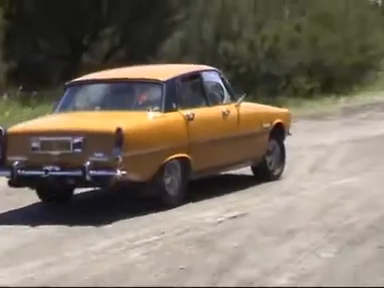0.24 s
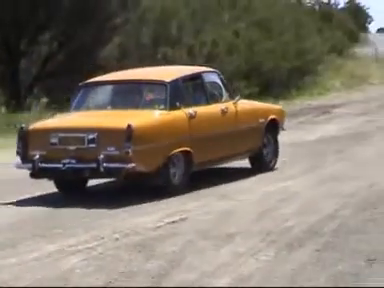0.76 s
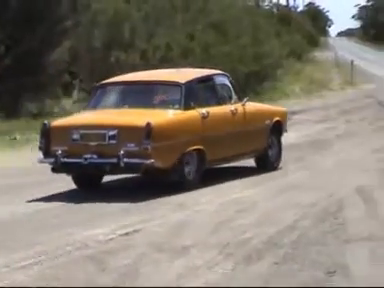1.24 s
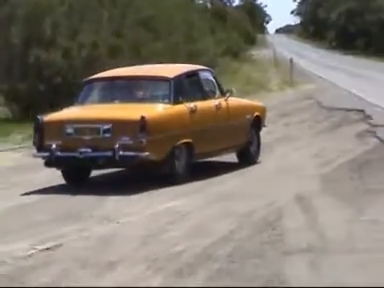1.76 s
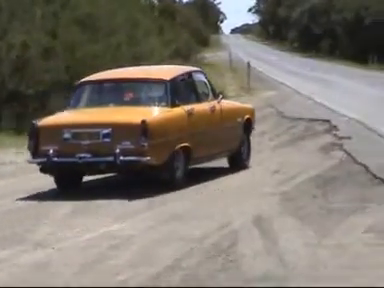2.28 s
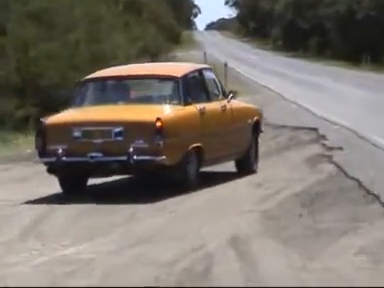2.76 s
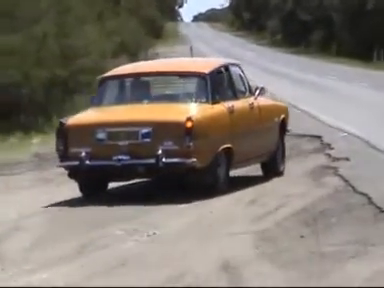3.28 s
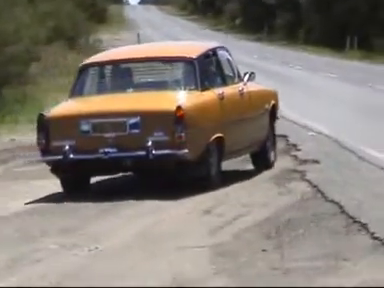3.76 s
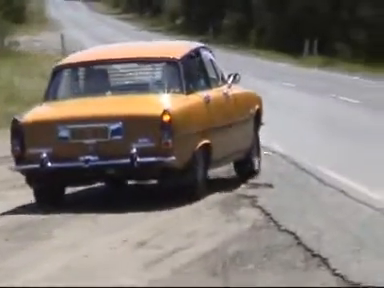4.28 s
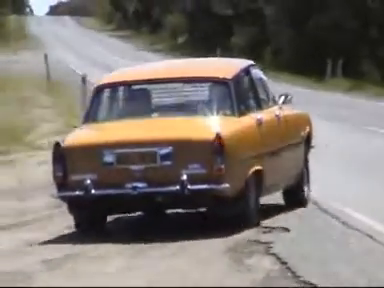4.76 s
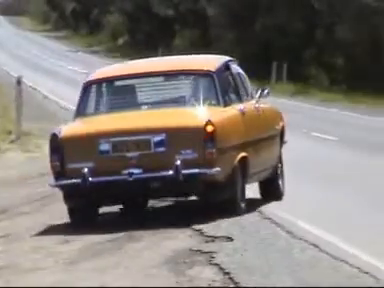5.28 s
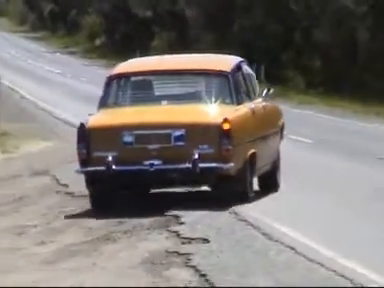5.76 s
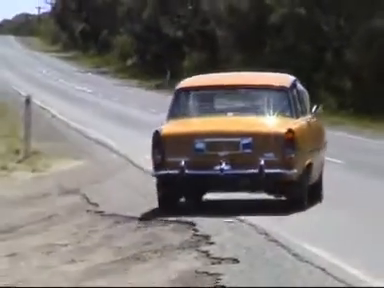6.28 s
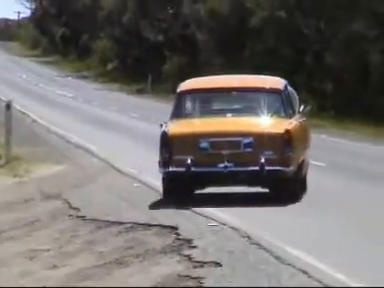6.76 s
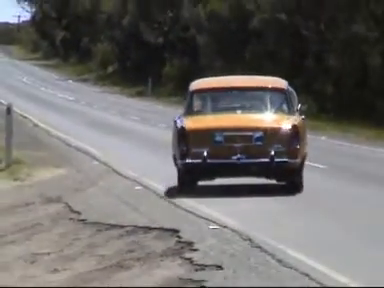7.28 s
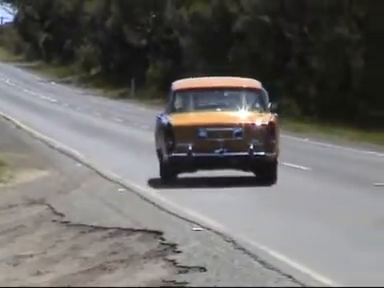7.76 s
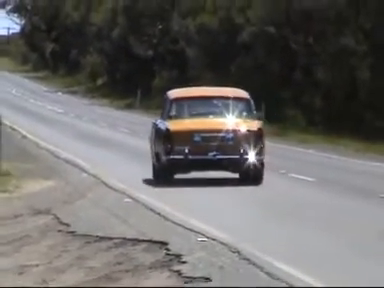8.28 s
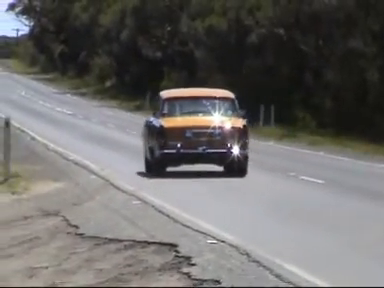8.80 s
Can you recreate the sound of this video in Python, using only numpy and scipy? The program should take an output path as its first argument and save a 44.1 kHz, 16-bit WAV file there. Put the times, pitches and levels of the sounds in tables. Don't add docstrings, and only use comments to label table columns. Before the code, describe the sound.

Open roadside, close stereo microphones behind an old eight-cylinder saloon, dry with almost no echo. From 0 to 1.5 s it creeps with a low, lumpy exhaust burble, tyres crunching loose gravel, small stones snapping brightly. Around 1.7 s the engine drops to a softer, slower idle until 3.1 s; stones keep ticking, with firm dull knocks near 2.2 and 2.5 s. Revs jump from 3.2 to 3.9 s as it pulls away, with a deep knock and low squeak near 3.8 s. A quick falling spring squeak comes at 4.45 s, a tiny chirp at 4.9 s, then a sandy scuff around 5.2 s. A strong crunch at 6.1 s and faint knocks follow as gravel fades. The engine eases from 6 to 7.1 s, then from 7.5 s pulls harder, fuller and raspier, pitch climbing, still strong at 9 s. Faint hiss and thin high motor whine run throughout.

```python
import sys
import numpy as np
from scipy import signal
from scipy.fft import rfft, irfft, next_fast_len
from scipy.io import wavfile
from scipy.ndimage import uniform_filter1d

SR = 44100
rng = np.random.default_rng(int(sys.argv[2]) if len(sys.argv) > 2 else 0)


def linear_from_db(decibels):
    return 10 ** (np.asarray(decibels, float) / 20)


def digitize_waveform(pressure):
    field = np.atleast_2d(pressure).T
    bounded = np.clip(field, -1, 1)
    quanta = np.round(bounded * 32767).astype(np.int16)
    wavfile.write(sys.argv[1], SR, quanta)


N = 398223
T = np.arange(N) / SR


def evened(x):
    return x / np.sqrt(np.mean(x ** 2) + 1e-20)


def curve(rows):
    seconds, *columns = np.transpose(rows)
    return [np.interp(T, seconds, column) for column in columns]


def read(points, hz):
    table_hz, value = np.transpose(points)
    return np.interp(np.log(hz + 1), np.log(table_hz + 1), value)


def coloured(x, points):
    size = next_fast_len(N + 4096)
    gain = linear_from_db(read(points, np.fft.rfftfreq(size, 1 / SR)))
    return irfft(rfft(x, size) * gain, size)[..., :N]


def ring(x, hz, width):
    decay, turn = np.exp(-np.pi * width / SR), 2 * np.pi * hz / SR
    feedback = [1, -2 * decay * np.cos(turn), decay * decay]
    return signal.lfilter([0, 2 * (1 - decay) * np.sin(turn)], feedback, x)


# frequency in Hz, likeness from 0 to 1.
LIKENESS = [(60, .99), (280, .995), (620, .99), (1350, .97), (2930, .945), (6000, .92), (9000, .72),
            (13000, .9)]


def paired(shared, loose):
    size = next_fast_len(N)
    same = np.clip(read(LIKENESS, np.fft.rfftfreq(size, 1 / SR)), 0, 1)
    mid = np.sqrt((1 + same) / 2) * rfft(shared, size)
    side = np.sqrt((1 - same) / 2) * rfft(loose, size)
    return irfft(np.array([mid + side, mid - side]), size)[:, :N]


# frequency in Hz, level in dB per Hz.
HISS_COLOUR = [(1200, -3), (1700, -7.5), (2050, -13.5), (2400, -6), (2900, -6), (4000, -11.5), (5600, -11),
               (7000, -10), (9000, -26.5), (12000, -24), (15500, -33)]
# frequency in Hz, level in dB.
MOTOR_TONES = [(5593, -68.5), (5728, -64.5), (6293, -87.5)]


def air():
    hiss = linear_from_db(-55) * evened(coloured(rng.standard_normal((2, N)), HISS_COLOUR))
    waver = 1 + 0.00089 * evened(uniform_filter1d(rng.standard_normal(N), 4000))
    warped_time = np.cumsum(waver) / SR
    whine = sum(linear_from_db(db + 1) * np.sin(2 * np.pi * hz * warped_time) for hz, db in MOTOR_TONES)
    return hiss + whine


# start in seconds, length in seconds, first Hz, last Hz, level in
# dB.
SHORT_SQUEAKS = [
    (3.725, .05, 600, 1000, -32),
    (4.41, .03, 3900, 3700, -43),
    (4.435, .055, 2300, 1650, -36),
    (4.43, .055, 6100, 5800, -42),
    (4.43, .04, 3500, 3200, -44),
    (4.92, .04, 5000, 5050, -45),
    (7.46, .06, 2420, 2400, -50),
]


def squeaks():
    out = np.zeros(N)
    for start, length, from_hz, to_hz, db in SHORT_SQUEAKS:
        hz = np.linspace(from_hz, to_hz, round(length * SR))
        rough = 1 + .5 * evened(uniform_filter1d(rng.standard_normal(len(hz)), 60))
        whistle = np.sin(2 * np.pi * np.cumsum(hz) / SR)
        out[round(start * SR):][:len(hz)] += linear_from_db(db) * rough * np.hanning(len(hz)) * whistle
    return out


# start in seconds, peak in dB, ring in Hz, treble in dB.
FLICKED_STONES = [(0.1014, -30, 2880, -10.5), (0.7902, -43, 4870, -3), (0.9605, -27, 5700, -9),
                  (1.1336, -22, 5180, -9.5), (1.495, -22.5, 3760, -6), (1.545, -21.5, 3500, -14.5),
                  (2.1327, -27.5, 4780, -7.5), (2.4362, -24.5, 4300, -12.5), (2.461, -25, 3750, -14),
                  (2.8177, -21.5, 4200, -20.5), (3.234, -36, 2470, -17.5), (3.4685, -25.5, 4260, -13),
                  (3.5294, -25.5, 3690, -18.5), (4.0028, -25.5, 2510, -15), (4.2334, -27.5, 3000, -13),
                  (5.343, -25.5, 3800, -4.5), (5.4194, -40, 4280, -6.5), (6.056, -38, 3920, -17),
                  (6.3506, -33, 4750, -2), (6.3586, -30.5, 3900, -21), (6.4038, -31.5, 4400, -15),
                  (6.494, -32, 4050, -9), (6.961, -34, 2540, -21)]
# start in seconds, peak in dB, ring in Hz, treble in dB.
HEAVY_STONES = [
    (2.221, -17, 988, -22),
    (2.447, -20, 1030, -28),
    (2.505, -14, 1270, -30),
    (3.414, -22, 1500, -33),
    (3.816, -17, 902, -29),
    (6.201, -27, 926, -23),
    (6.282, -30.5, 915, -24),
    (6.357, -30, 1700, -16),
]


def stones():
    out, t = np.zeros((2, N + 2000)), np.arange(1500) / SR
    for start, db, hz, treble_db in FLICKED_STONES + HEAVY_STONES:
        noise = rng.standard_normal((2, len(t)))
        knock = evened(ring(ring(noise[0], hz, .6 * hz), hz, 1.1 * hz)) * linear_from_db(-60 * t / .022)
        tick = evened(ring(ring(noise[1], 7500, 4000), 7500, 5000)) * linear_from_db(treble_db - 60 * t / .012)
        lean_db = np.array([[1], [-1]]) * rng.uniform(-2, 2.3)
        out[:, round(start * SR):][:, :len(t)] += linear_from_db(db - 8.0 + lean_db) * (knock + tick)
    return out[:, :N]


# middle in seconds, length in seconds, crunch lift in dB, grit lift in dB.
HEAPS = [
    (0.733, 0.16, -0.5, 6.5),
    (2.486, 0.039, 4.5, 2),
    (2.75, 0.27, 2.5, -2.5),
    (4.455, .05, 0, 4),
    (4.575, .13, 3, 6.5),
    (4.94, 0.067, 3.5, -3),
    (5.187, 0.36, -3, 12),
    (5.37, 0.12, 3, -0.5),
    (6.095, 0.11, 7, -4),
    (9.03, 0.028, 2, 6),
]


def scuffs():
    middle, length, *lifts = np.transpose(HEAPS)
    coarse = T[::64]
    bells = np.exp(-(2 * (coarse[:, None] - middle) / length) ** 2)
    return [np.interp(T, coarse, bells @ lift) for lift in lifts]


# time in seconds, crunch in dB.
GRAVEL = [(0, -34), (.15, -37.5), (.85, -39), (1, -35.5), (1.26, -39.5), (1.76, -37), (2.4, -40),
          (3.24, -42.5), (4.05, -39.5), (4.4, -40.5), (4.7, -42.5), (5.1, -46.5), (5.9, -46.5), (6.2, -51),
          (6.7, -50), (7.6, -46), (8.4, -47.5), (9.03, -47)]
# frequency in Hz, level in dB per Hz.
CRUNCH_COLOUR = [(600, -2), (900, -16), (1350, -2.5), (2000, -8), (2400, -7), (2750, -11), (4000, -9),
                 (5500, -12.5), (6800, -25.5), (9000, -54.5), (12000, -62)]
# frequency in Hz, level in dB per Hz.
GRIT_COLOUR = [(5000, 0), (7000, -2), (9000, -4.5), (11000, -12.5), (13500, -23), (15500, -30.5)]


def tyres():
    crunch_lift_db, grit_lift_db = scuffs()
    crunch_db = curve(GRAVEL)[0] + crunch_lift_db
    grit_db = grit_lift_db - 17 + 6.0
    clumps = linear_from_db(3.5 * evened(uniform_filter1d(rng.standard_normal(N), 900)))
    grains = np.zeros((2, N))
    for hz in np.geomspace(1000, 11000, num=4):
        hit = rng.random(N) < 120 * clumps / SR
        size_db = 2.95 * np.minimum(rng.exponential(1, N), 4)
        clicks = hit * linear_from_db(size_db) * rng.choice([-1, 1], (2, N))
        burst = np.exp(-np.arange(200) / 24.0) * rng.standard_normal(200)
        cracks = signal.oaconvolve(clicks, burst[None], axes=1)[:, :N]
        grains += evened(ring(cracks, hz, 0.83 * hz)) * np.sqrt(hz / 1e4)
    scrape = rng.standard_normal((2, N)) * clumps ** .2
    bed = scrape + 0.38 * evened(grains)
    crunch, grit = evened(coloured(bed, CRUNCH_COLOUR)), evened(coloured(bed, GRIT_COLOUR))
    return paired(*(linear_from_db(crunch_db) * (crunch + linear_from_db(grit_db) * grit)))


# time in seconds, firings a second.
ENGINE_SPEED = [(0.0, 62.85), (0.86, 65.08), (1.44, 64.87), (1.79, 56.03), (3.14, 54.55), (3.6, 64.04),
                (3.76, 78.99), (3.88, 84.53), (4.54, 85.19), (4.81, 82.03), (5.08, 82.83), (5.26, 87.75),
                (5.81, 92.78), (5.96, 97.44), (6.68, 108.36), (7.02, 106.61), (7.59, 121.83),
                (9.03, 132.75)]


def firings():
    return .512 + np.cumsum(curve(ENGINE_SPEED)[0]) / SR


# time in seconds, state (0 creep, 1 idle, 2 pull, 3 ease, 4 drive away).
ENGINE_LOAD = [
    (1.55, 0),
    (1.85, 1),
    (3.1, 1),
    (3.7, 2),
    (5.85, 2),
    (6.25, 3),
    (7.1, 3),
    (7.5, 4),
]


def load_at(seconds):
    return np.interp(seconds, *np.transpose(ENGINE_LOAD))


def by_load(values, state):
    return np.interp(state, np.arange(5), values)


# time in seconds, level of the note in dB.
EFFORT = [(0.0, -14.5), (1.46, -17.5), (1.71, -24), (2.08, -22), (3.14, -25.5), (3.17, -20.5),
          (3.54, -19.5), (3.8, -12.5), (4.83, -15), (5.41, -15), (5.93, -19), (6.19, -17.5), (7.09, -21),
          (7.62, -13), (8.4, -12.5), (9.03, -15)]


def effort_db():
    return curve(EFFORT)[0]


TAIL_RING_DB = [-8.5, -7.5, -6.5, -3, 3.5]
RASP_REPEAT = [.5, .5, .6, .4, .8]
PUFF_LEVEL_DB = [-31.5, -34.5, -35, -31.5, -26]
# frequency in Hz, width in Hz, level in dB.
TAIL_PIPE = [(648, 136, 2.5), (1076, 63, -2.5), (1690, 140, -15.5), (2397, 160, -21.5), (535, 86, -11.5)]
# frequency in Hz, level in dB per Hz.
RUMBLE_COLOUR = [(30, -47), (45, -16.5), (70, -29.5), (130, -12.5), (260, 10.5), (400, -10), (520, -32),
                 (900, -45.5), (3000, -100.5)]


def gas():
    note_db, count, state = effort_db(), firings(), load_at(T)
    repeat = by_load(RASP_REPEAT, state)
    puff_db = by_load(PUFF_LEVEL_DB, state) + 0.32 * (note_db + 14)
    gaining = np.clip(np.gradient(curve(ENGINE_SPEED)[0]) * SR, 0, 30)
    puff_db += 0.0691 * uniform_filter1d(gaining, SR // 2, origin=SR // 5)
    strength = linear_from_db(3.6 * rng.standard_normal(int(count[-1]) + 1))[count.astype(int)]
    cycle = np.resize(rng.standard_normal(128), 129)
    locked = np.interp(count % 8, np.arange(129) / 16, cycle)
    flow = np.sqrt(1 - repeat) * rng.standard_normal((2, N)) + np.sqrt(repeat) * .25 * locked
    puffs = (0.76 + strength * np.exp(-(count % 1) / 0.28)) * flow
    rasp = sum(linear_from_db(db) * ring(ring(puffs, hz, width), hz, 3 * width) for hz, width, db in TAIL_PIPE)
    rasp = linear_from_db(by_load(TAIL_RING_DB, state)) * rasp
    breath = [(200, -41.5), (300, 5), (420, -4.0), (510, -13.5), (720, 7.0), (900, -1), (1500, -12),
              (3000, -58.0), (8000, -83.5)]
    rasp += linear_from_db(-13.0) * coloured(puffs, breath)
    rasp /= np.sqrt(uniform_filter1d(rasp[0] ** 2, SR // 3) + 1e-12)
    rumble = linear_from_db(note_db - 22) * evened(coloured(rng.standard_normal((2, N)), RUMBLE_COLOUR))
    return paired(*(linear_from_db(puff_db - 2.0) * rasp + rumble))


# multiple of the engine cycle rate, level in dB.
PULSE_SHAPE = [(3, -47.5), (5, -0.5), (7.5, 5), (56, 4.5), (66, -17.5), (85, -44.5), (150, -100)]
LOW_LINES_DB = [-7, 1, 1.6, 1.9, 1]
HIGH_LINES_DB = [-0.9, 4, -1.5, -3.5, -4]


def blown(x):
    hz, t, z = signal.stft(x, SR, nperseg=8192, noverlap=7168)
    cycles_a_second = np.interp(t, *np.transpose(ENGINE_SPEED)) / 8
    multiple = hz[:, None] / cycles_a_second
    state = load_at(t)
    db = read(PULSE_SHAPE, multiple)
    db += by_load(LOW_LINES_DB, state) * np.clip((11 - multiple) / 2, 0, 1)
    db += by_load(HIGH_LINES_DB, state) * np.clip((multiple - 36) / 8, 0, 1)
    return signal.istft(z * linear_from_db(db), SR, nperseg=8192, noverlap=7168)[1][:N]


CYLINDER_BURN_DB = [(0.1, 0.5, 4.5, -9, 3.6), (2.5, 0, -13.5, -1, -1.6), (-2, -2, 1, 0.1, 4),
                    (-4, 5, -0.5, 1, -2.5), (2.5, 2.5, 0.4, -2.2, 3.1), (1.5, -3.5, -1, -0.7, 6),
                    (-2.7, 3, 0, 0, 0.5), (-2, 8, -1.5, -2, -1)]
CYLINDER_LAG_MS = [(-0.3, -1.63, -1.66, 2.4, -0.058), (-0.017, -1.1, 1.15, 2.18, 0.33),
                   (0.96, -2.5, -0.82, 1.58, -0.46), (-0.44, -1.6, -2.5, 1.84, 0.041),
                   (-0.78, -0.1, -1.0, 1.13, -0.23), (-1.15, -2, -2, 1.48, -0.75),
                   (0.71, -0.2, -1.76, 1.9, -0.65), (0.39, 0, -0.31, 1.6, -0.23)]
CYLINDER_BANK = [1, 0, 0, 1, 0, 1, 1, 0]
LEFT_PUSH = [(-0.38, 0.038, -0.00086, 0.0, -0.25), (0.27, -0.09, -0.16, -0.34, 0.96),
             (1.0, 1.0, 0.83, 0.71, 0.97), (-0.42, -0.52, -0.36, -0.29, -0.3),
             (-0.12, -0.00043, -0.25, 0.16, -0.48), (0.24, 0.41, 0.083, -0.016, -0.23),
             (0.044, 0.05, -0.0093, -0.019, 0.02), (0.13, 0.25, 0.041, 0.026, -0.039)]
RIGHT_PUSH = [(-0.16, -0.04, 0.0012, -0.058, -0.38), (0.36, -0.22, -0.75, -0.31, 0.91),
              (0.64, 1, 0.42, 1.0, 0.95), (-0.071, -0.3, 0.22, -0.7, -0.019),
              (-0.37, -0.23, 0.43, 0.248, 0.18), (0.25, 0.12, -0.43, -0.213, -0.62),
              (0.006, -0.028, 0.097, -0.048, 0.03), (0.16, 0.15, -0.066, 0.0037, -0.01)]
# spread from firing to firing in dB, one value for each load state.
BURN_SPREAD_DB = [1.5, 2.8, 0.51, .45, 0.4]
# frequency in Hz, width in Hz.
EXHAUST_PIPE = [(82.4, 54.8), (121.8, 22.1), (169.2, 27.7), (196.5, 30.4), (245.4, 36.6), (272.7, 40.4),
                (372.9, 33.1), (690.8, 132.7)]


def note():
    count = firings()
    at = np.flatnonzero(np.diff(np.floor(count))) + 1
    weight = np.clip(1 - abs(load_at(T[at])[:, None] - np.arange(5)), 0, 1)
    cylinder = count[at].astype(int) % 8
    burn_db = (weight * np.array(CYLINDER_BURN_DB)[cylinder]).sum(axis=1)
    lag_ms = (weight * np.array(CYLINDER_LAG_MS)[cylinder]).sum(axis=1)
    on_left = np.array(CYLINDER_BANK)[cylinder, None]
    voice = np.where(on_left, weight @ np.transpose(LEFT_PUSH), weight @ np.transpose(RIGHT_PUSH))
    uneven_db = weight @ BURN_SPREAD_DB * rng.standard_normal(len(at))
    push = linear_from_db(burn_db + uneven_db)[:, None] * voice
    kicks = np.zeros((len(EXHAUST_PIPE), N))
    arrival = at + np.round(lag_ms * SR / 1000).astype(int)
    kicks[:, np.clip(arrival, 0, N - 1)] = push.T
    pipe = blown(sum(ring(kick, hz, width) for kick, (hz, width) in zip(kicks, EXHAUST_PIPE)))
    span = signal.windows.hann(round(.3 * SR))
    power = signal.oaconvolve(pipe ** 2, span, "same") / signal.oaconvolve(np.ones(N), span, "same")
    return linear_from_db(effort_db()) * pipe / np.sqrt(power + 1e-20)


# time in seconds, share from 0 to 1.
GROUND_DIP = [(0, 0.65), (1.7, 0.79), (3.3, .9), (5, 0.41), (6.5, 0.31), (7.5, .1)]


def ground(x):
    band = signal.lfilter(*signal.iirpeak(497, 497 / 66, SR), x)
    return x - np.clip(curve(GROUND_DIP)[0], 0, 1) * band


# frequency in Hz, level in dB.
EXHAUST_PATH = [(30, -20.5), (48, -3), (70, -1), (250, -0.5), (330, 3), (440, 0), (500, -3.5), (620, 0)]


def scene():
    exhaust = note()
    echo = np.roll(exhaust, 60) * linear_from_db(-47) * [[1], [-1]]
    car = ground(coloured(exhaust + echo + gas(), EXHAUST_PATH))
    return car + tyres() + stones() + squeaks() + air()


def low_pass(x):
    return signal.sosfilt(signal.butter(12, 15700, fs=SR, output="sos"), x)


# frequency in Hz, left over right in dB.
LEFT_OVER_RIGHT = [(60, 0.59), (300, 1.22), (1200, .1), (2500, .3), (5000, -.5), (9000, .9), (13000, .5)]


def record(dry):
    left = coloured(dry[0], [(hz, db / 2) for hz, db in LEFT_OVER_RIGHT])
    right = coloured(dry[1], [(hz, -db / 2) for hz, db in LEFT_OVER_RIGHT])
    mix = np.array([left, right]) + .0018
    return low_pass(mix)


dry = scene()
out = record(dry)
digitize_waveform(out)
```